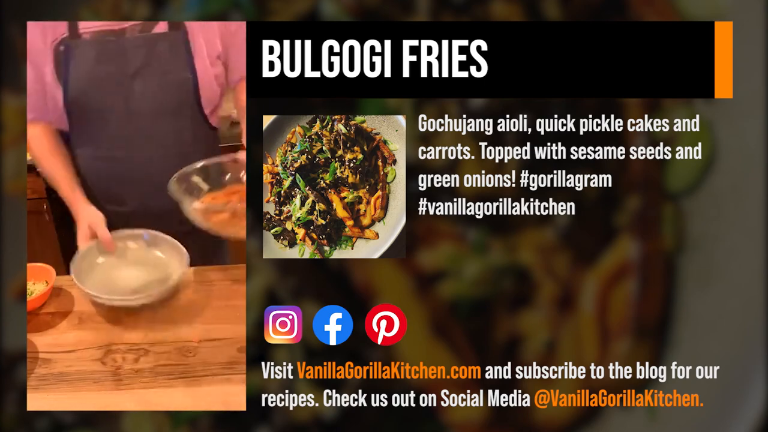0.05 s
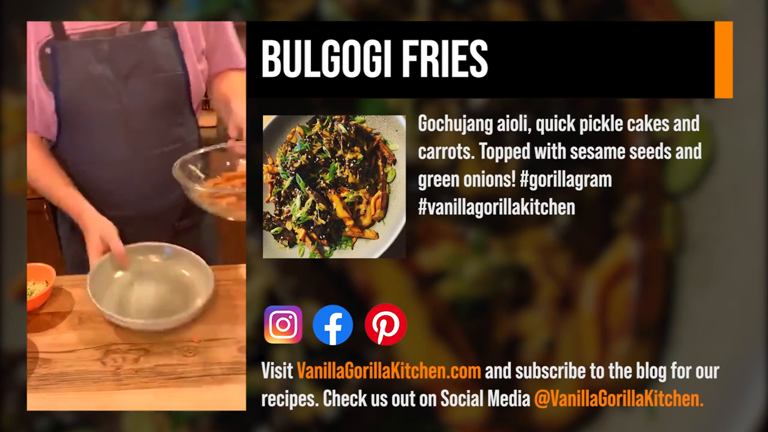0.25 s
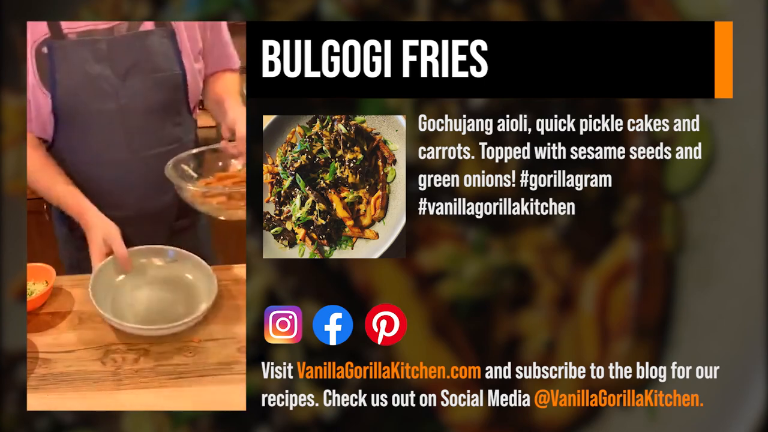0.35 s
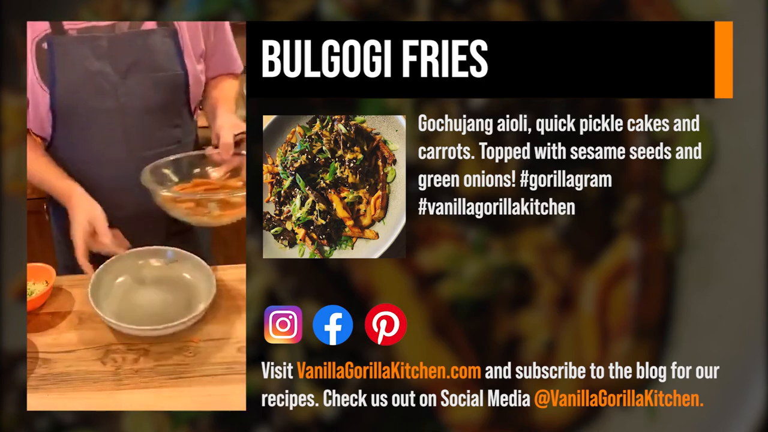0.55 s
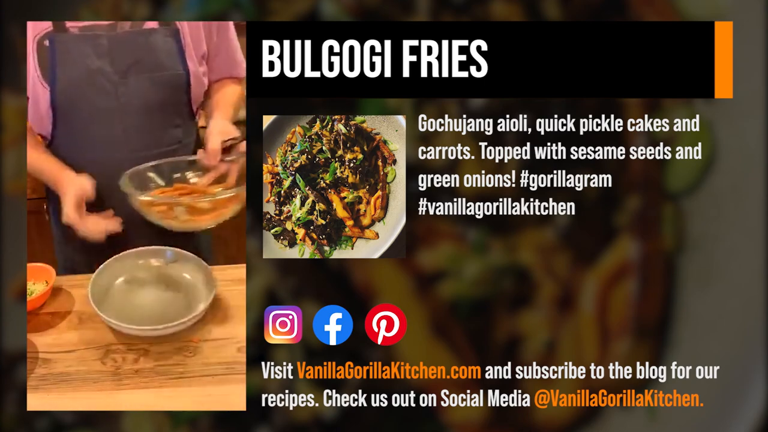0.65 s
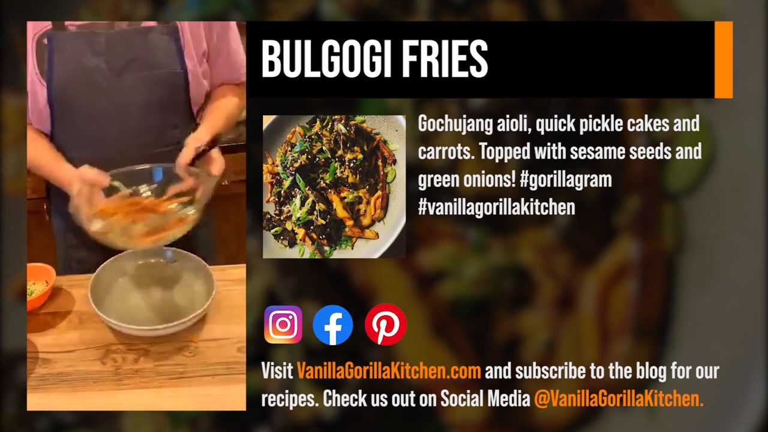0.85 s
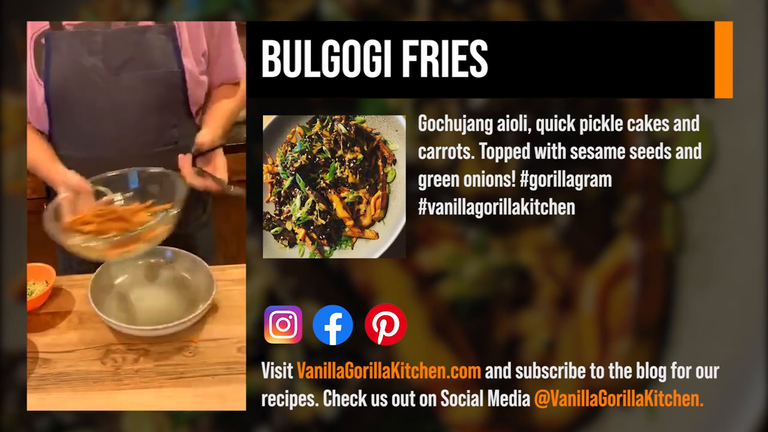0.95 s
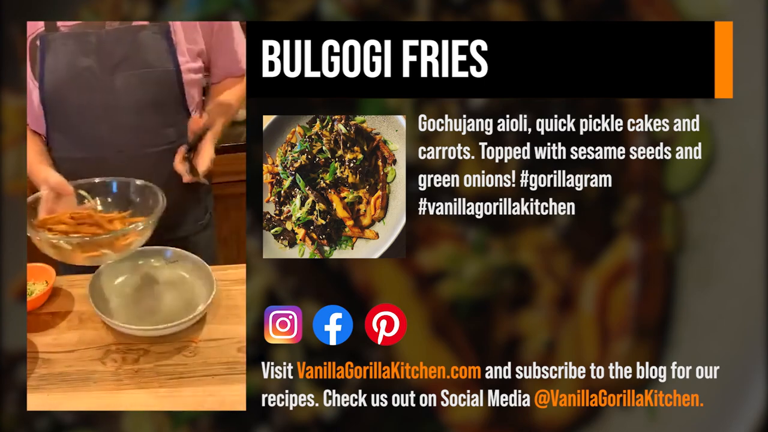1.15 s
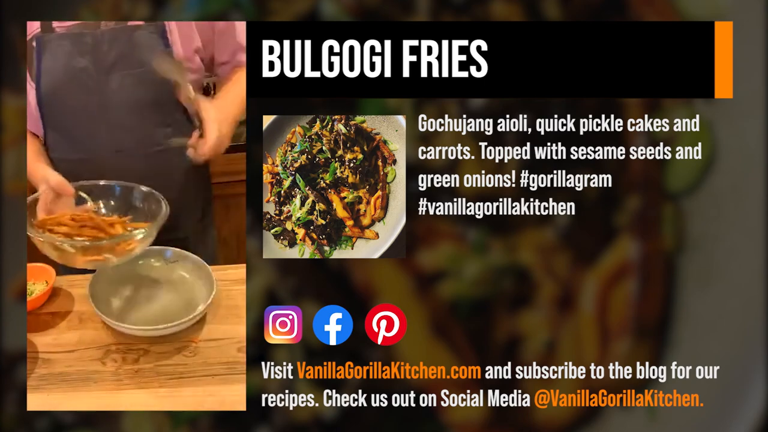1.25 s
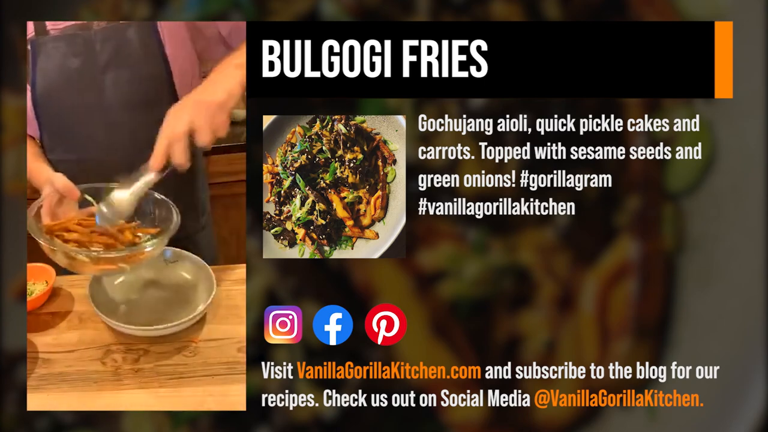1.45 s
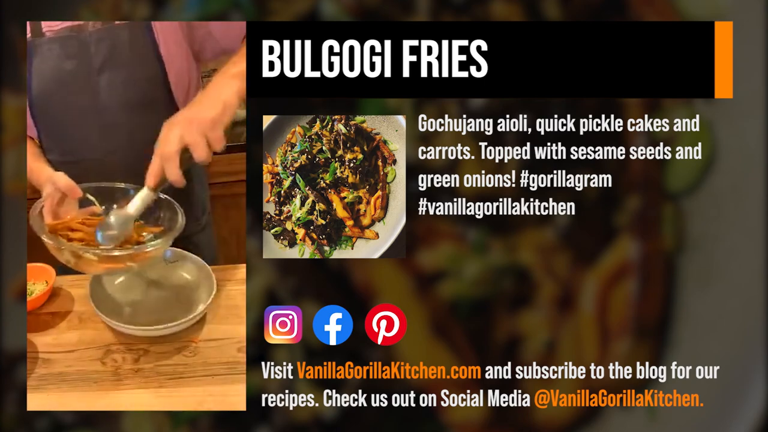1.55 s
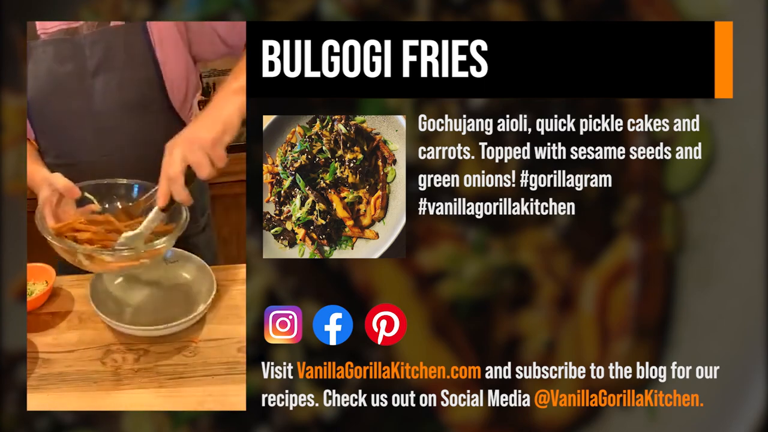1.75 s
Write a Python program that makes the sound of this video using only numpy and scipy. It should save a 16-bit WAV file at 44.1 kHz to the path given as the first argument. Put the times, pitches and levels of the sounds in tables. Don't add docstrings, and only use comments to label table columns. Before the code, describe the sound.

Close microphone in a small reflective kitchen: a glass bowl is set down on wood in two solid knocks, then steel tongs are picked up, click together, strike a glass bowl and tap softly through food.

```python
import sys
import numpy as np
from scipy import signal
from scipy.io import wavfile
from scipy.ndimage import uniform_filter1d

SR = 44100
rng = np.random.default_rng(int(sys.argv[2]) if len(sys.argv) > 2 else 0)


def volts_from_decibels(level):
    exponent = np.asarray(level, float) / 20
    return 10 ** exponent


def log_audio(samples):
    frames = np.atleast_2d(samples).T
    limited = np.clip(frames, -1, 1)
    pcm = np.round(limited * 32767).astype(np.int16)
    wavfile.write(sys.argv[1], SR, pcm)


N = 79380

# (frequency [Hz], width [Hz], level [dB])
ARM_BODY = [(2846, 280, -3), (3177, 32, 2), (4630, 690, 7.5), (5045, 360, 0.5), (5510, 210, -3.5),
            (7080, 78, 0.5), (7850, 130, 1.5), (9600, 260, -15), (11600, 500, -2), (13800, 270, -12),
            (15000, 300, -8.5)]


def read(points, hz):
    f, value = np.transpose(points)
    return np.interp(np.log(hz + 1), np.log(f + 1), value)


def noise(tone, count, patchy_db=0.):
    hz = np.fft.rfftfreq(512, 1 / SR)
    real, imag, patches = rng.standard_normal((count // 128 + 5, 257, 3)).T
    patches = uniform_filter1d(patches, size=6, axis=0, mode="wrap")
    patches = uniform_filter1d(patches, size=8, axis=1)
    level_db = read(tone, hz)[:, None] + patchy_db * patches / patches.std()
    spectrum = (real + 1j * imag) * volts_from_decibels(level_db)
    x = signal.istft(spectrum, nperseg=512, noverlap=384)[1][:count]
    return x / x.std()


def strikes(events, body, ring=(), crack_db=-70, rise_ms=.3, scatter_db=5.0, room_db=-8, wash_db=-70):
    # (frequency [Hz], level [dB per Hz])
    crack_tone = [(800, -25.5), (1900, -13.5), (3200, -8), (5500, -5.5), (10000, -9), (16000, -9)]
    out = np.zeros((2, N + SR))
    t = np.arange(SR if len(ring) else SR // 4) / SR
    rise = (1 - np.exp(-t / (rise_ms / 1000 + 1e-5))) ** 2
    for start, db, contact_ms in events:
        luck = rng.standard_normal(len(body) + len(ring))
        hit = np.zeros(len(t))
        for (hz, width, level), u in zip(body, luck):
            decay = width * np.exp(-np.pi * width * t)
            hit += volts_from_decibels(level + scatter_db * u) * decay * np.sin(2 * np.pi * hz * t)
        hit = rise * hit
        hit = hit / (np.max(abs(hit)) + 1e-12)
        for (hz, level, t60), phase in zip(ring, luck[::-1]):
            hit += rise * volts_from_decibels(level - 60 * t / t60) * np.sin(2 * np.pi * hz * t + phase)
        crack = np.zeros(len(t))
        crack[:2048] = noise(crack_tone, count=2048) * rise[:2048]
        direct = hit + volts_from_decibels(crack_db - 60 * t / 0.012) * crack
        to_room = volts_from_decibels(room_db) * hit + volts_from_decibels(wash_db - 60 * t / 0.008) * crack
        push = np.exp(-2 * np.pi * t[:512] * 1000 / contact_ms)
        blow = signal.oaconvolve(np.array([direct, to_room]), push[None] / push.sum())[:, :len(t)]
        first = round(start * SR)
        out[:, first:first + len(t)] += volts_from_decibels(db) * blow
    return out[:, :N]


def rubbing(curve, tone, patchy_db, grit):
    t = np.arange(N) / SR
    s, db = np.transpose(curve)
    fade_in = np.clip((t - s[0]) / 0.0063 + (s[0] < .02), 0, 1)
    fade_out = np.clip((s[-1] + 0.025 - t) / 0.0067, 0, 1)
    level = volts_from_decibels(np.interp(t, s, db)) * fade_in * fade_out
    grains = (rng.random(N) < 300 / SR) * rng.exponential(1, N)
    grains = uniform_filter1d(grains, size=60) * 60
    return level * (1 + grit * grains) * noise(tone, count=N, patchy_db=patchy_db)


def room_tone():
    # (frequency [Hz], level [dB per Hz])
    air_tone = [(25, -40), (60, 11.5), (130, -12), (450, -1.5), (1400, -13.5), (2400, -20), (4000, -29.5),
                (8000, -65)]
    # (frequency [Hz], level [dB])
    fan_lines = [(60, -69), (271, -64.5), (313, -69)]
    hiss_tone = [(500, -14.0), (8000, -18.0), (16000, -56)]  # (Hz, dB per Hz)
    t = np.arange(N) / SR
    out = volts_from_decibels(-58) * noise(air_tone, count=N, patchy_db=4.0)
    out += volts_from_decibels(-81) * noise(hiss_tone, count=N)
    for hz, db in fan_lines:
        waver = rng.standard_normal((2, N))
        waver = uniform_filter1d(waver, size=3000, axis=1, mode="wrap") * 55
        out += volts_from_decibels(db) * (1 + .5 * waver[0]) * np.sin(2 * np.pi * hz * t + 0.26 * waver[1])
    return out


def kitchen(x):
    # (frequency [Hz], t60 [s])
    decay = [(100, 0.75), (400, 0.59), (1000, 0.39), (2500, 0.35), (6000, 0.33), (14000, 0.21)]
    taps = np.zeros(SR)
    at = np.arange(160, SR - 12, 12)
    taps[at + rng.integers(0, 12, len(at))] = rng.choice([-1., 1.], len(at))
    hz, t, z = signal.stft(taps, SR, nperseg=256)
    z = z * volts_from_decibels(-60 * t / read(decay, hz)[:, None])
    tail = signal.istft(z, SR, nperseg=256)[1]
    tail = tail * np.clip(np.arange(len(tail)) / SR / 0.0013, 0, 1)
    return signal.fftconvolve(x, tail / np.linalg.norm(tail))[:N]


def hand_rustle():
    # (time [s], level [dB])
    rub_curve = [(.79, -77), (.82, -54.5), (.84, -60), (.93, -45.5), (1.0, -60), (1.15, -73), (1.35, -66),
                 (1.45, -73), (1.6, -63), (1.66, -52.5), (1.71, -60), (1.745, -52.5), (1.8, -46.5)]
    # (frequency [Hz], level [dB per Hz])
    rub_tone = [(1000, -5), (2500, -5.5), (5500, 1.5), (8000, -7.5), (12000, -9.5), (16000, -22)]
    return rubbing(rub_curve, rub_tone, patchy_db=2.5, grit=.35)


def bowl_slide():
    # (time [s], level [dB])
    drag_curve = [(0, -64), (.05, -67.5), (.16, -58), (.25, -54.5), (.31, -62.5), (.37, -76.5)]
    # (frequency [Hz], level [dB per Hz])
    drag_tone = [(1000, -3), (2000, -4), (6000, -7.5), (10000, -11), (16000, -19)]
    return rubbing(drag_curve, drag_tone, patchy_db=1.5, grit=.2)


def counter_boom():
    # (time [s], peak [dB], contact [ms])
    booms = [
        (.24, -36.5, 1.5),
        (.49, -30, 3.4),
    ]
    # (frequency [Hz], width [Hz], level [dB])
    board = [(66.4, 26, -18), (91, 67, -2), (185, 21.5, -11.5), (283, 85, 8)]
    return strikes(booms, board, rise_ms=24.0, scatter_db=0.0, room_db=-2.5)


def food_plops():
    # (time [s], peak [dB], contact [ms])
    plops = [
        (1.653, -43, 0.39),
        (1.664, -53, 0.63),
        (1.724, -42, 0.81),
        (1.748, -43, 0.51),
        (1.756, -33.5, 0.23),
        (1.775, -41, 0.35),
        (1.791, -52, 0.63),
    ]
    # (frequency [Hz], width [Hz], level [dB])
    plop_body = [(500, 120, -6), (640, 170, 0), (800, 150, -3), (1020, 120, -8), (1280, 150, -10)]
    return strikes(plops, plop_body, rise_ms=2.55, scatter_db=4.5, room_db=-1)


def hinge_ticks():
    # (time [s], peak [dB], contact [ms])
    ticks = [
        (.1396, -48, .07),
        (1.2516, -33, .2),
        (1.273, -42, .3),
        (1.3305, -45, .4),
        (1.3414, -40, .25),
        (1.3813, -44, .2),
        (1.466, -52, .15),
    ]
    return strikes(ticks, ARM_BODY, crack_db=-3, rise_ms=0.6, scatter_db=4, room_db=-12, wash_db=-12)


def bowl_tip():
    # (time [s], peak [dB], contact [ms])
    tips = [
        (.2258, -4.5, .6),
        (.2862, -17, .9),
    ]
    # (frequency [Hz], width [Hz], level [dB])
    tip_body = [(523, 55, -5.5), (948, 163, -0.5), (1004, 196, -7), (1265, 76, -5.5), (1618, 90, -15),
                (2022, 97, -17.5)]
    return strikes(tips, tip_body, rise_ms=0.76, scatter_db=1, room_db=-11.0)


def bowl_set_down():
    # (time [s], peak [dB], contact [ms])
    touches = [
        (.4512, -20, 0.5),
        (.4555, -15.5, 0.56),
    ]
    # (time [s], peak [dB], contact [ms])
    sets = [
        (.481, -4, .3),
        (.4935, -14, .2),
        (.499, -15, .5),
        (.512, -20, .6),
    ]
    # (time [s], peak [dB], contact [ms])
    swell = [
        (.514, -17.5, 0.83),
    ]
    # (frequency [Hz], width [Hz], level [dB])
    touch_body = [(529, 57, -5.5), (824, 77, 1), (1320, 110, -22.5), (2000, 740, -22), (4100, 33, -34.5),
                  (6650, 26, -44.5)]
    set_body = [(815, 110, -7), (1050, 200, -9), (1303, 260, 1), (1893, 140, -10), (2520, 60, -27),
                (3700, 80, -33), (4330, 50, -30)]
    swell_body = [(983, 24, 0)]
    # (frequency [Hz], level [dB], t60 [s])
    set_ring = [(748, -35, 0.43), (1272, -36, .25), (1297, -33, 0.33), (1400, -38, .39), (1696, -38, .35),
                (1965, -33, .19)]
    upper_notes = [(2530, -28.5, 0.15), (2850, -36.5, 0.13), (3480, -38.5, 0.22), (3690, -40.5, 0.19),
                   (4296, -35.5, 0.27), (5660, -44, 0.32), (5800, -38, 0.11), (6460, -42.5, 0.23),
                   (7068, -32.5, 0.11), (7700, -41, 0.16), (8500, -35.5, 0.026)]
    clear_notes = [(912, -21, .25), (953, -17, .7), (2083, -29, .95)]
    hits = strikes(touches, touch_body, rise_ms=0.81, room_db=-5.5)
    hits += strikes(sets, set_body, crack_db=-38, rise_ms=0.4, scatter_db=.6, room_db=-7, wash_db=-33)
    hits += strikes(sets[:1], [], set_ring, rise_ms=3.8, room_db=2.5)
    hits += strikes(sets[1:2], [], upper_notes, crack_db=-20, rise_ms=1.5, room_db=-16)
    hits += strikes(swell, swell_body, rise_ms=7., room_db=-8)
    hits += strikes(sets[:1], [], clear_notes, rise_ms=6., room_db=-24)
    return hits


def tongs_drag():
    # (time [s], peak [dB], contact [ms])
    nudges = [
        (.7976, -55, .1),
        (.808, -52, .2),
        (.816, -44, .2),
        (.8252, -37, .2),
    ]
    # (frequency [Hz], width [Hz], level [dB])
    nudge_body = [(1450, 300, -7), (2680, 30, 1), (4130, 36, 1), (5830, 90, -8), (7400, 50, -14),
                  (8100, 50, -12)]
    # (time [s], peak [dB], contact [ms])
    handle = [
        (.812, -50, .1),
        (.823, -43, .1),
    ]
    # (frequency [Hz], level [dB], t60 [s])
    handle_tone = [(1498, 0, .75)]
    hits = strikes(nudges, nudge_body, rise_ms=1.6, scatter_db=2., room_db=-6, crack_db=-10)
    hits += strikes(handle, [], handle_tone, rise_ms=6., room_db=-20)
    return hits


def tongs_lift():
    # (time [s], peak [dB], contact [ms])
    lifts = [
        (.8475, -11.5, 0.1),
        (.8505, -12.5, 0.15),
        (.8545, -19.5, 0.057),
        (.8595, -25.5, .1),
    ]
    # (time [s], peak [dB], contact [ms])
    rattles = [
        (.9153, -23, .15),
        (.9285, -29, .15),
        (.9946, -27, .07),
    ]
    # (frequency [Hz], width [Hz], level [dB])
    lift_body = [(790, 190, -13), (1845, 89, -6.5), (2710, 270, -2), (4290, 440, -1.5), (4760, 65, -13),
                 (5823, 76, 1.5), (6940, 140, -9.5), (7870, 98, -4), (9290, 81, -9), (10880, 120, -17),
                 (12860, 54, -2), (12400, 60, -20), (14300, 100, -31)]
    rattle_body = [(2280, 350, -11.5), (4040, 510, -2.5), (4760, 110, -1.5), (6280, 630, 1), (6900, 55, -2),
                   (7880, 160, -6.5), (11000, 180, -4.5), (13200, 160, -11), (14700, 130, -30)]
    # (frequency [Hz], level [dB], t60 [s])
    lift_ring = [(2662, -11, 0.08), (5770, -41, 0.16)]
    hits = strikes(lifts, lift_body, crack_db=4.6, scatter_db=0.5, rise_ms=0.63, room_db=-9.5, wash_db=0.5)
    hits += strikes(lifts[:1], [], lift_ring, rise_ms=0.39, room_db=-10)
    hits += strikes(rattles, rattle_body, crack_db=-3.5, rise_ms=0.52, scatter_db=-3.5,
                    room_db=-12, wash_db=-1)
    return hits


def tongs_snap():
    # (time [s], peak [dB], contact [ms])
    snaps = [
        (1.1855, -32, .2),
        (1.1897, -27, .12),
        (1.1947, -14, .05),
    ]
    # (frequency [Hz], level [dB], t60 [s])
    snap_ring = [(3120, -31, .2), (5070, -33, .18), (7030, -31, .15)]
    return strikes(snaps, ARM_BODY, snap_ring, crack_db=-3.5, scatter_db=2.0, rise_ms=0.55,
                   room_db=-10.5, wash_db=-8)


def tongs_on_glass():
    # (time [s], peak [dB], contact [ms])
    clinks = [
        (1.4862, -5, 0.02),
        (1.4885, -16, .04),
        (1.4905, -20, .04),
    ]
    # (time [s], peak [dB], contact [ms])
    taps = [
        (1.7555, -20, 0.11),
        (1.7575, -26, .07),
    ]
    # (frequency [Hz], width [Hz], level [dB])
    clink_body = [(910, 200, -7), (1780, 120, -14), (2490, 320, -9), (3580, 130, -10), (4120, 280, -1),
                  (4910, 120, -11), (5600, 150, -6), (6070, 280, 1), (7570, 160, -7), (8420, 200, -3),
                  (9350, 150, -11), (10600, 400, -9), (12600, 500, -9), (15600, 120, -13)]
    tap_body = [(2140, 100, -20), (3500, 220, -14), (5120, 220, 2.5), (6250, 180, -4), (7500, 380, -2.5),
                (9700, 340, -9), (11680, 270, -4), (14500, 360, -29)]
    # (frequency [Hz], level [dB], t60 [s])
    clink_ring = [(1497, -50, .8), (2678, -26, .23), (6050, -35, .25), (8420, -37, .22), (14063, -24, .05)]
    hits = strikes(clinks, clink_body, crack_db=-6, rise_ms=0.25, scatter_db=.6, room_db=-14, wash_db=-6)
    hits += strikes(clinks[:1], [], clink_ring, rise_ms=1.0, room_db=-17)
    hits += strikes(taps, tap_body, crack_db=0, rise_ms=0.83, room_db=-21, wash_db=3.5)
    return hits


def scene():
    bowl = bowl_tip() + bowl_set_down() + counter_boom()
    tongs = tongs_drag() + tongs_lift() + tongs_snap() + hinge_ticks() + tongs_on_glass()
    direct, to_room = bowl + tongs + food_plops()
    rubs = bowl_slide() + hand_rustle()
    return (direct + kitchen(to_room) + rubs + room_tone())[None]


def roll_off(x):
    return signal.sosfilt(signal.butter(12, 16530, fs=SR, output="sos"), x)


def record(dry):
    low_cut = signal.butter(4, 42, "high", fs=SR, output="sos")
    band_limit = signal.firwin(127, 15850, window=("kaiser", 9), fs=SR)
    mix = signal.sosfilt(low_cut, dry)
    mix = signal.oaconvolve(mix, band_limit[None], "same")
    return roll_off(mix)


dry = scene()
out = record(dry)
log_audio(out)
```